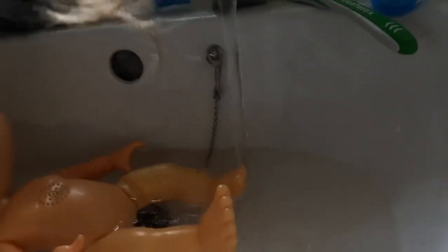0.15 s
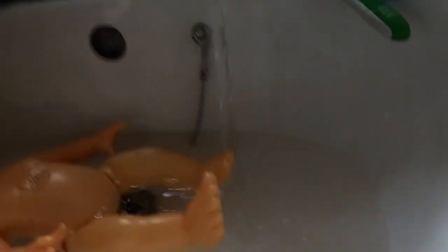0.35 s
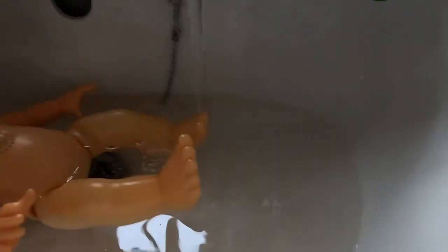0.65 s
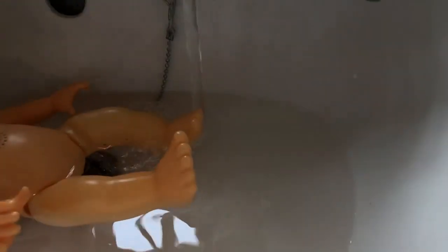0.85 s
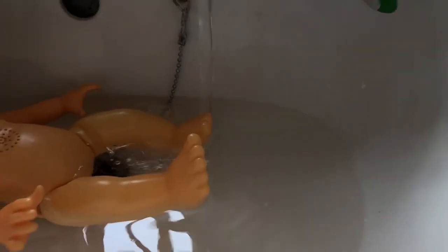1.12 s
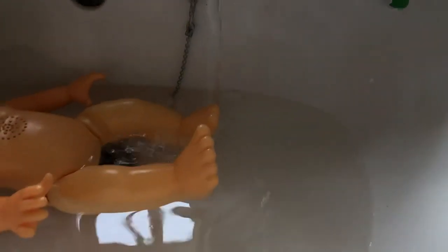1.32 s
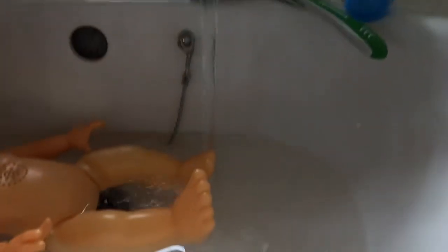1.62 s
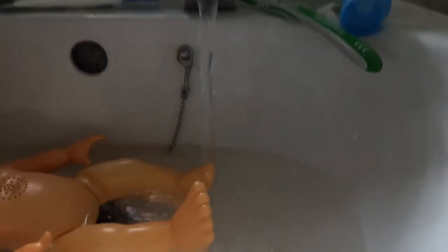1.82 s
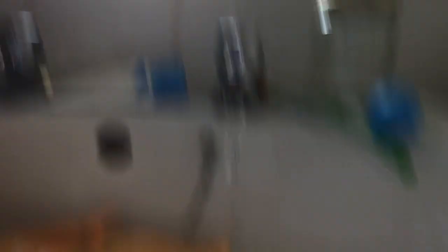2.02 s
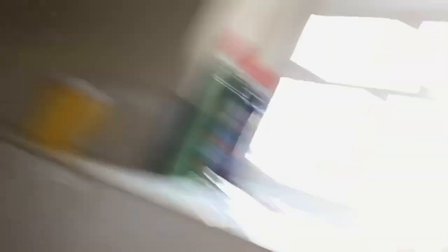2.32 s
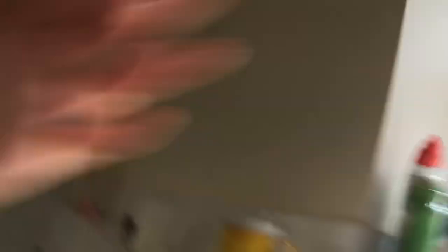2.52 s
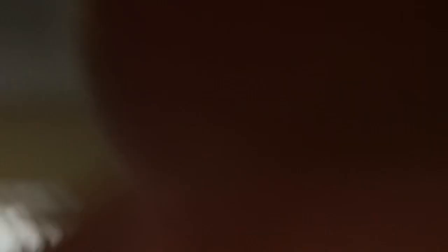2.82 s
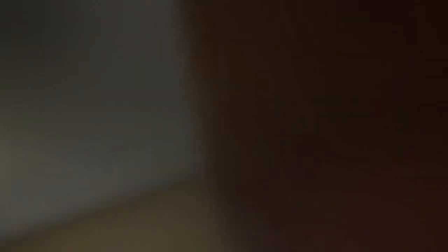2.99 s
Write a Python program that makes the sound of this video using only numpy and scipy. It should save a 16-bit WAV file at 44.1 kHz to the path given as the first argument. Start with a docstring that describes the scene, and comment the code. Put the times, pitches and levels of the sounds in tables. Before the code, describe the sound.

A thin stream from a tap splashes and bubbles in a bathtub, with drops ticking on plastic. Close knocks come first, followed by a wavering low hum and hollow handling thuds as the microphone swings around the small bathroom.

```python
"""A thin trickle with fine spray and tiny ringing bubbles: a tap runs into a shallow bath in a small
tiled room. Drips ring, drops burst on the plastic and the tap whistles faintly. Knocks land close to
the microphone, each a click that slides down into a thud. Later a low hum swells and the hand-held
camera is swung round: fingers bump and rub its case."""
import sys
import numpy as np
from scipy import signal
from scipy.fft import rfft, irfft
from scipy.io import wavfile

SR = 44100
rng = np.random.default_rng(int(sys.argv[2]) if len(sys.argv) > 2 else 0)


def persist_wave(psi):
    """Save psi, clipped to +-1, as 16-bit WAV."""
    counts = np.round(np.clip(psi, -1, 1) * 32767).astype(np.int16)
    wavfile.write(sys.argv[1], SR, np.atleast_2d(counts).T)


N = 138915
T = np.arange(N) / SR
BLOW_BINS_HZ = np.fft.rfftfreq(8192, 1 / SR) + 1e-3
DRIP_CYCLES, DRIP_RISE = 6.4, 0.021


def amp(db):
    """dB to gain."""
    return 10 ** (np.asarray(db) / 20)


def unit(x):
    """Scale to rms 1."""
    return x / np.sqrt(np.mean(x ** 2) + 1e-20)


def colour(points, hz):
    """Gain of a spectrum table at hz."""
    f, db = np.transpose(points)
    return amp(np.interp(np.log(hz + 1), np.log(f), db))


def level(points):
    """Gain over time from a level table."""
    return amp(np.interp(T, *np.transpose(points)))


def shaped(x, points):
    """Filter x by a spectrum table, to rms 1."""
    return unit(irfft(rfft(x) * colour(points, np.fft.rfftfreq(N, 1 / SR)), N))


def band(x, centre_hz, width_hz):
    """Pass x through one resonance, to rms 1."""
    hz = np.fft.rfftfreq(len(x), 1 / SR)
    return unit(irfft(rfft(x) / (1 + 2j * (hz - centre_hz) / width_hz) ** 2, len(x)))


def add(mix, start_s, sound):
    """Mix a sound in at start_s."""
    part = mix[max(round(start_s * SR), 0):][:len(sound)]
    part += sound[:len(part)]


def impacts(per_s, spread_db):
    """Random clicks: many small, a few large."""
    hits = rng.random(N) < per_s / SR
    return hits * amp(spread_db * np.minimum(rng.exponential(1, N), 4)) * rng.choice([-1, 1], N)


def flutter(per_s, depth_db):
    """A randomly wandering factor."""
    steps = rng.standard_normal(4000)
    return amp(depth_db * np.interp(T * per_s, np.arange(len(steps)), steps))


def bubble(hz, cycles, rise):
    """A bubble rings for a few cycles, its pitch rising as it fades."""
    turns = np.arange(1500) * hz / SR
    age = turns / cycles
    phase = 2 * np.pi * turns * (1 + rise * np.minimum(age, 4) / 2)
    return (1 - np.exp(-turns)) * np.exp(-age) * np.sin(phase)


def bubbles(pitches_hz, per_s, spread_db, cycles, rise):
    """One random bubble train per pitch, each of rms 1."""
    trains = []
    for hz in pitches_hz:
        births = impacts(per_s / len(pitches_hz), spread_db)
        ring = bubble(hz * rng.uniform(0.96, 1.03), cycles, rise)
        trains.append(unit(signal.oaconvolve(births, ring)[:N]))
    return np.array(trains)


def stream():
    """The stream throws up bubbles, a soft wash and fine spray; larger bubbles gurgle in the pool."""
    # Spectra of the spray and of droplets clicking on plastic: f/Hz, level/dB
    spray = [(500, -11), (880, -4), (1020, 5), (1200, -0.5), (2700, -2), (4000, -1), (6300, -6),
             (8200, -11), (15000, -21)]
    droplets = [(4000, -30), (9000, -26), (14000, 14)]
    # Splashing, fine spray, froth of like-sized bubbles, gurgle: t/s, level/dB
    splashing = [(0, -5.5), (.36, 2.5), (.45, -1.5), (1.0, -4), (1.28, 2.5), (1.48, -3.5), (1.6, 2.5),
                 (1.75, -3), (2.15, -0.5), (2.35, 1.5), (2.45, -5.5), (2.75, -2), (3.14, -14)]
    spatter = [(0, -8.5), (1.0, -4), (1.25, 7.5), (1.48, -1.5), (1.95, 3), (2.5, -5)]
    frothing = [(0, -65), (.07, -51.5), (.2, -62), (.28, -53.5), (.5, -79)]
    gurgling = [(.3, -77.5), (.9, -59.5), (1.3, -81)]
    fizz_hz, tick_hz = np.geomspace(1000, 13000, 36), np.geomspace(5500, 14000, 16)
    froth_hz = 4300 + 1250 * np.linspace(-.5, .5, 10)
    fizz = bubbles(fizz_hz, per_s=1700, spread_db=4, cycles=4.5, rise=0.021)
    fizz = shaped(np.sqrt(fizz_hz) @ fizz, spray)
    wash = shaped(rng.standard_normal(N), spray)
    ticks = unit(1 / tick_hz @ bubbles(tick_hz, per_s=170, spread_db=3.5, cycles=16, rise=0.074))
    froth = bubbles(froth_hz, per_s=440, spread_db=2.5, cycles=DRIP_CYCLES, rise=DRIP_RISE)
    clicks = shaped(impacts(per_s=89, spread_db=1.5), droplets)
    gurgle = bubbles(fizz_hz[2:10], per_s=900, spread_db=6.5, cycles=DRIP_CYCLES, rise=DRIP_RISE)
    out = level(splashing) * (amp(-57.5) * fizz + amp(-60.5) * wash)
    out += amp(-64.5) * level(spatter) * ticks
    out *= flutter(per_s=41, depth_db=4.5)
    out += amp(-67.5) * level(spatter) * clicks
    return out + level(frothing) * unit(froth.sum(0)) + level(gurgling) * shaped(gurgle.sum(0), spray)


def room(x, t60_s=0.053, wet_db=-11):
    """Short, dense reflections off tub and tiles."""
    t = T[:SR // 2]
    tail = rng.standard_normal(len(t)) * amp(-60 * t / t60_s) * (t > .002)
    return x + amp(wet_db) * signal.oaconvolve(x, tail / np.linalg.norm(tail))[:N]


def whistle():
    """The tap whistles faintly in one narrow band."""
    whistling = [(0, -80), (1.0, -78), (2.8, -88)]  # tap whistle: t/s, level/dB
    return level(whistling) * band(rng.standard_normal(N), centre_hz=10500, width_hz=120)


def hush():
    """The room's steady low noise."""
    air = [(30, -34), (80, 0.5), (220, -1), (400, -9), (570, -2), (760, -22), (16000, -43)]  # room noise: f/Hz, level/dB
    return amp(-61.5) * shaped(rng.standard_normal(N), air)


def handling():
    """Skin catches and slips on the case; the moving hand makes it rumble."""
    # Spectra of finger rub, hand swish, case rumble: f/Hz, level/dB
    rub = [(60, -9), (150, 9.5), (450, 4), (545, 2.5), (680, 6.5), (810, 4.5), (1100, -8.5), (2400, -5.5),
           (15000, -32)]
    swish = [(900, -21), (1400, 14), (1650, -6), (2100, 12), (2600, -6.5), (3400, 3), (7000, -16.5),
             (15000, -9)]
    rumble = [(25, -35), (42, -40), (66, -0.5), (110, -4.5), (200, -15), (400, -24), (900, -47.5)]
    # Their envelopes: t/s, level/dB
    rubbing = [(.22, -69.5), (.33, -48), (.39, -51.5), (.44, -82), (1.35, -56.5), (1.5, -72.5), (2.05, -57),
               (2.12, -43.5), (2.2, -57.5), (2.42, -65.5), (2.81, -53), (2.84, -38), (2.91, -53.5),
               (2.97, -47.5), (3.05, -65)]
    swishing = [(2.64, -82), (2.67, -51.5), (2.8, -61), (2.91, -94), (2.97, -52), (3.03, -65.5),
                (3.06, -49.5), (3.14, -55.5)]
    rumbling = [(0, -46), (.2, -57.5), (.36, -44.5), (.5, -66), (1.3, -45.5), (1.55, -54), (2.05, -50.5),
                (2.5, -57), (3.14, -51)]
    grain = impacts(per_s=3000, spread_db=4.5)
    friction = level(rubbing) * shaped(grain, rub) + level(swishing) * shaped(grain, swish)
    return friction + level(rumbling) * shaped(rng.standard_normal(N), rumble)


def splats(decay_s=0.00076):
    """Drops burst on the plastic in crisp, unpitched ticks."""
    drops = [(0.0504, -35.5, 11200), (0.483, -41, 8300), (0.8026, -35.5, 10100), (1.0902, -36.5, 11400),
             (1.8403, -32.5, 8900), (2.357, -27.5, 6600), (2.5545, -38, 7700), (3.0464, -39, 13600)]  # bursts: t/s, peak/dB, centre f/Hz
    out, t = np.zeros(N), T[:1024]
    for s, db, hz in drops:
        burst = band(rng.standard_normal(len(t)) * np.exp(-t / decay_s), hz, width_hz=0.73 * hz)
        add(out, s, amp(db) * burst / abs(burst).max())
    return out


def drips(smack_s=0.00074, smack_db=-19):
    """Single drips stand out: a brief smack and a ringing bubble."""
    drops = [(0.1204, -29, 7020), (.164, -37.5, 3760), (.196, -38, 4090), (0.22, -36.5, 3700),
             (0.2664, -27, 4030), (0.5475, -30.5, 5640), (0.8805, -34, 6350), (1.6417, -34, 6260),
             (2.359, -37.5, 1428)]  # drips: t/s, level/dB, bubble f/Hz
    out = np.zeros(N)
    for s, db, hz in drops:
        ring = bubble(hz, DRIP_CYCLES, DRIP_RISE)
        smack = np.diff(rng.standard_normal(len(ring) + 1)) / 2 * np.exp(-T[:len(ring)] / smack_s)
        add(out, s, amp(db + 0.5) * (ring + amp(smack_db) * smack))
    return out


def causal(gain):
    """Minimum-phase spectrum: a struck object rings after the blow, never before."""
    log_gain = np.log(np.r_[gain, gain[-2:0:-1]])
    return np.exp(np.conj(signal.hilbert(log_gain)))[:len(gain)]


def blow(s, thud_db, slope_db_oct, lag_s, low_hz, clack_db, body, top_hz):
    """The case clacks over a thud whose bass lags its treble. Returns start/s, sound."""
    case_modes = [(987, 350, -4.5), (1372, 260, -0.5), (1926, 332, 0), (2420, 300, -11.5),
                  (3170, 530, -6.5), (4810, 1300, -8.5), (7400, 990, -19), (10500, 1000, -18.5)]  # camera case resonances: f/Hz, width/Hz, level/dB
    hz, lead_samples = BLOW_BINS_HZ, 512
    ring = sum((-1) ** k * amp(db) / (1 + 1j * (hz ** 2 - f ** 2) / (hz * width)) ** 2
               for k, (f, width, db) in enumerate(case_modes))
    clack = amp(clack_db) * abs(ring) / (1 + (hz / 8600) ** 2)
    octaves = np.log2(1 + (hz / 93) ** 4) / 4  # above a soft knee at 93 Hz
    thud = amp(thud_db + slope_db_oct * octaves) * colour(body, hz) / np.sqrt(1 + (hz / top_hz) ** 4)
    spectrum = causal(np.hypot(thud, clack)) / np.sqrt(1 + (low_hz / hz) ** 10)
    delay_s = np.minimum(lag_s * (100 / hz) ** 1.2, 0.021)
    phase = 2 * np.pi * np.cumsum(delay_s[::-1])[::-1] * (hz[1] - hz[0])
    return s - lead_samples / SR, np.roll(irfft(spectrum * np.exp(1j * phase)), lead_samples)


def knocks(rattle_t60_s=0.16, rattle_db=-37):
    """Hard knocks clack, thud and leave a low rattle in the tub."""
    # Knocks: t/s, thud/dB, slope/(dB/oct), lag at 100 Hz/s, low edge/Hz, clack/dB
    hits = [(0.3893, 28.5, -7, 0.016, 67, -6.5), (0.6976, 26, -4.5, 0.01, 65, 6),
            (1.002, 27, -13.5, 0.0112, 60.6, -37), (1.3422, 38.5, -4, 0.017, 109, 22)]
    body = [(110, 1), (180, 1.5), (290, -0.5), (500, 0), (750, -0.5)]  # thud colour: f/Hz, level/dB
    out, t = np.zeros(N), T[:SR // 2]
    for hit in hits:
        add(out, *blow(*hit, body, top_hz=540))
    rattle = band(rng.standard_normal(len(t)), centre_hz=225, width_hz=840)
    rattle *= amp(-60 * t / rattle_t60_s)
    return out + amp(rattle_db) * signal.oaconvolve(out, rattle / np.linalg.norm(rattle))[:N]


def hum():
    """A low hum wavers and creeps up in pitch."""
    course = [(1.6, 62.4, -61.5), (1.8, 61.75, -48), (2.05, 64, -45), (2.22, 62.8, -58),
              (2.36, 66.8, -44.5), (2.8, 72.1, -51), (2.95, 68.1, -62)]  # hum: t/s, f/Hz, level/dB
    s, hz, db = np.transpose(course)
    pitch_hz = np.interp(T, s, hz) * flutter(per_s=33, depth_db=0.9)
    tone = unit(np.sin(2 * np.pi * np.cumsum(pitch_hz) / SR))
    return level(np.c_[s, db]) * flutter(per_s=27, depth_db=2) * tone


def bumps():
    """Soft fingers bump the case with hollow thuds."""
    hits = [(1.918, 22, -19, .01, 85), (2.0992, 26.5, -8, 0.0065, 61), (2.105, 27.5, -6, 0.0069, 93),
            (2.1113, 30.5, -7.5, 0.0074, 105), (2.1318, 14, -4, 0.0074, 91),
            (2.1425, 20.5, -5.5, 0.0048, 62), (2.52, 19.5, -14.5, 0.0121, 56),
            (2.6606, 2.5, -1.5, 0.0014, 109), (2.8217, 31.5, -14, 0.0056, 59.6),
            (2.8336, 41.5, -13, .0056, 51.7), (2.8389, 44.5, -10.5, .0073, 48),
            (2.8476, 39.5, -7.5, 0.005, 93), (2.937, 32, -21, .0068, 88), (2.956, 24.5, -8.5, 0.0079, 82.5),
            (2.989, 21.5, -9.5, 0.0096, 65.6), (3.008, 20.5, -12, 0.0072, 91)]  # bumps: t/s, thud/dB, slope/(dB/oct), lag at 100 Hz/s, low edge/Hz
    hollow = [(130, 1), (225, -3), (290, 4.5), (430, -3.5), (545, 4), (670, -5), (810, 2.5), (1100, -10.5)]  # thud colour: f/Hz, level/dB
    out = np.zeros(N)
    for hit in hits:
        add(out, *blow(*hit, clack_db=hit[1] - 46, body=hollow, top_hz=860))
    return out


def scene():
    """Water in the room, all else dry; mono."""
    water = room(stream() + drips() + splats())
    return (water + whistle() + hush() + handling() + knocks() + hum() + bumps())[None]


def record(dry):
    """Low-pass at 15.9 kHz."""
    lowpass = signal.firwin(401, 15900, window=("kaiser", 8), fs=SR)
    return signal.oaconvolve(dry, lowpass[None], "same")


dry = scene()
out = record(dry)
persist_wave(out)
```